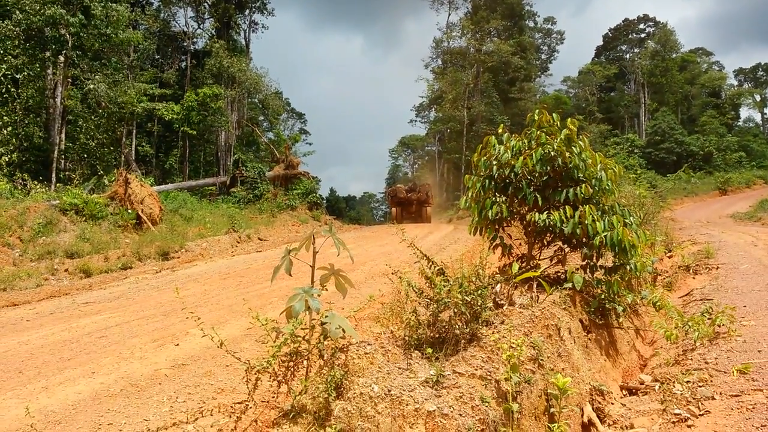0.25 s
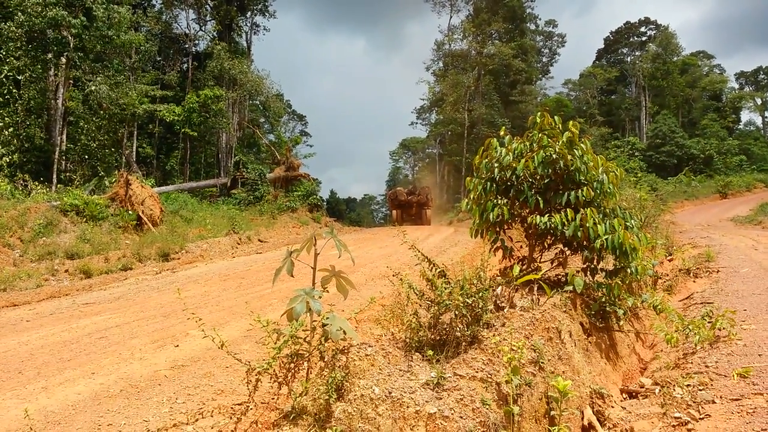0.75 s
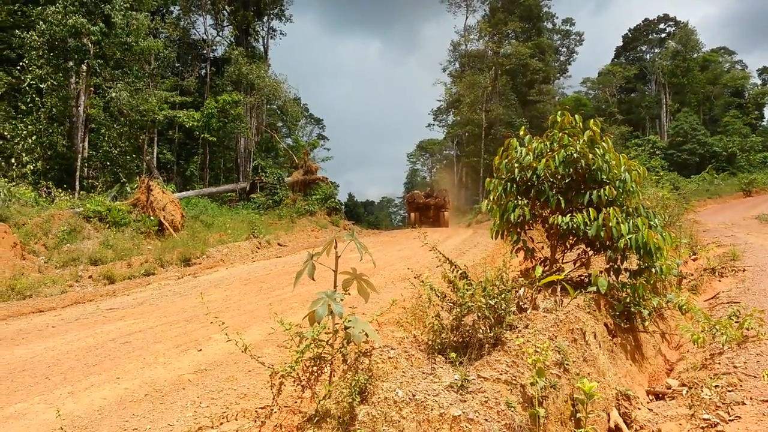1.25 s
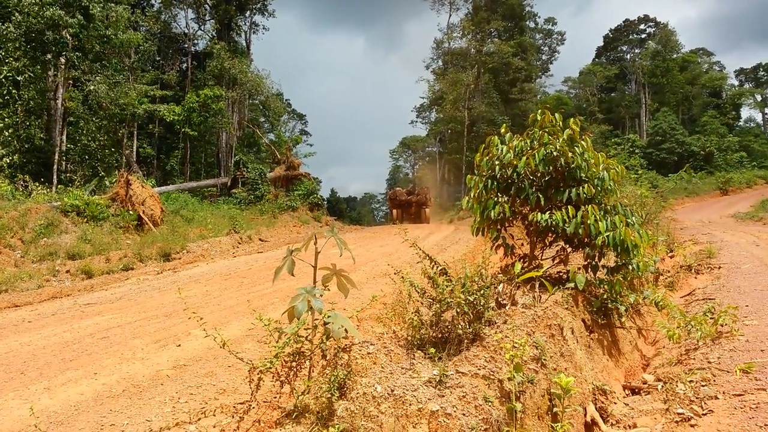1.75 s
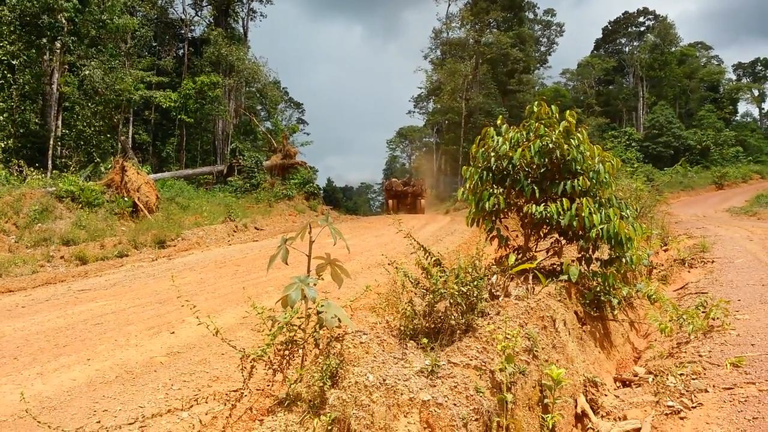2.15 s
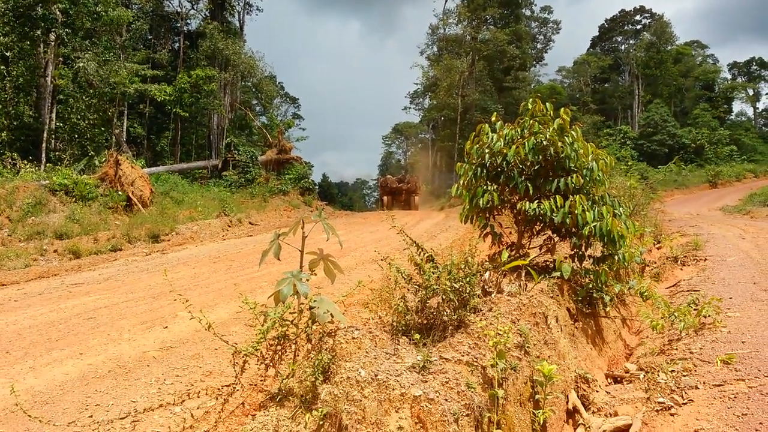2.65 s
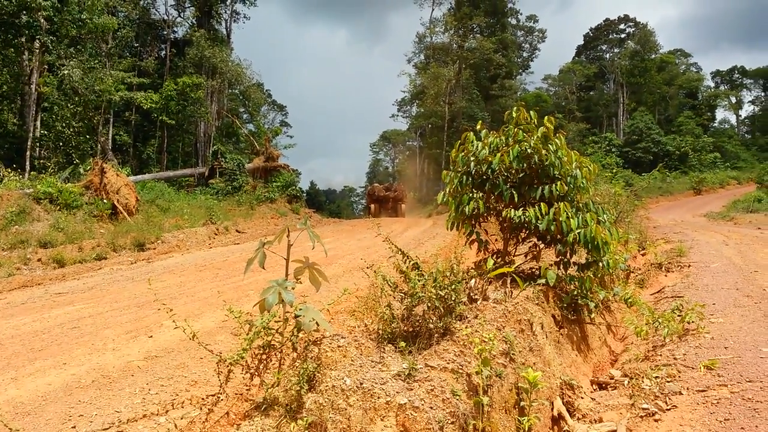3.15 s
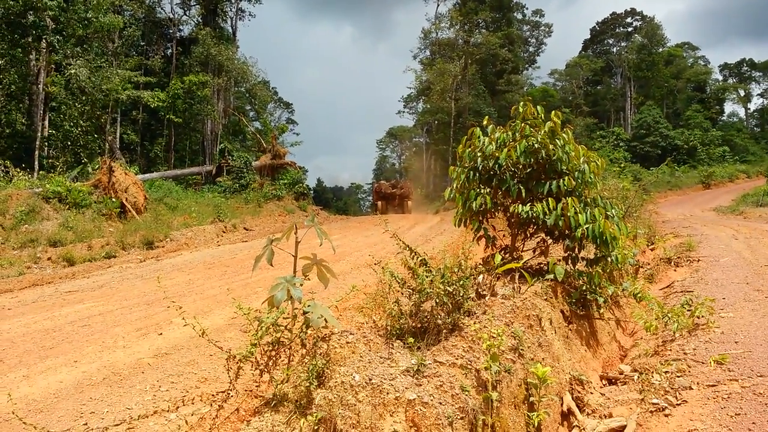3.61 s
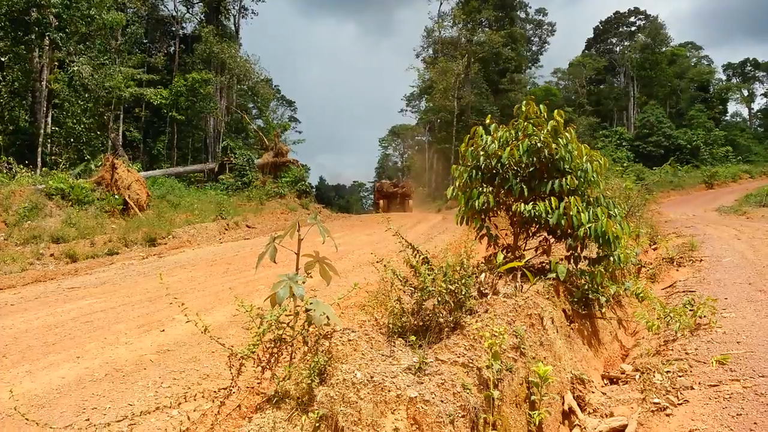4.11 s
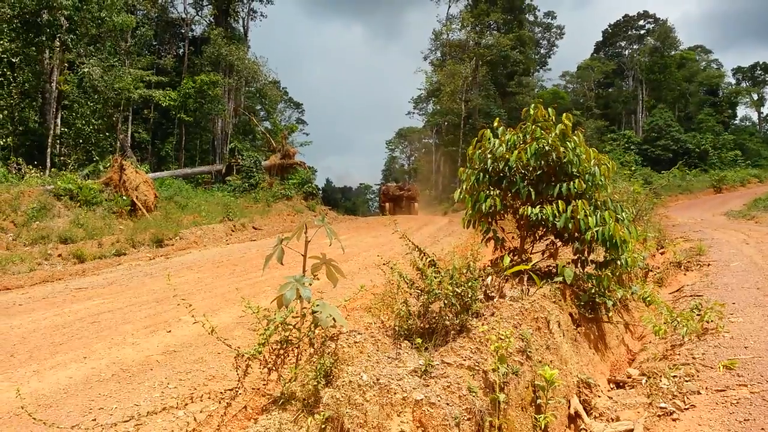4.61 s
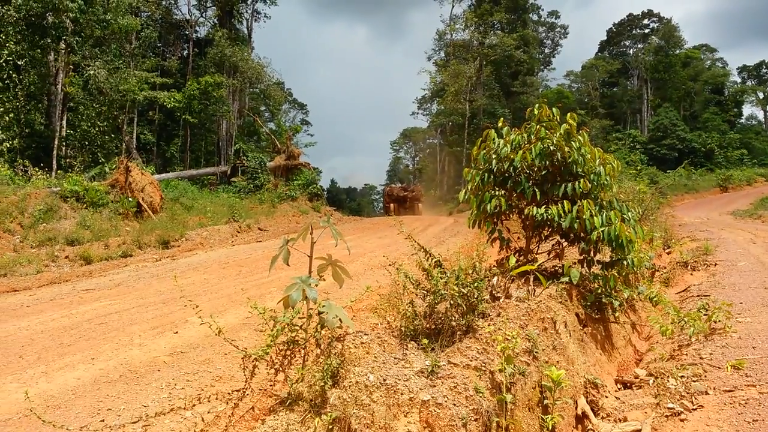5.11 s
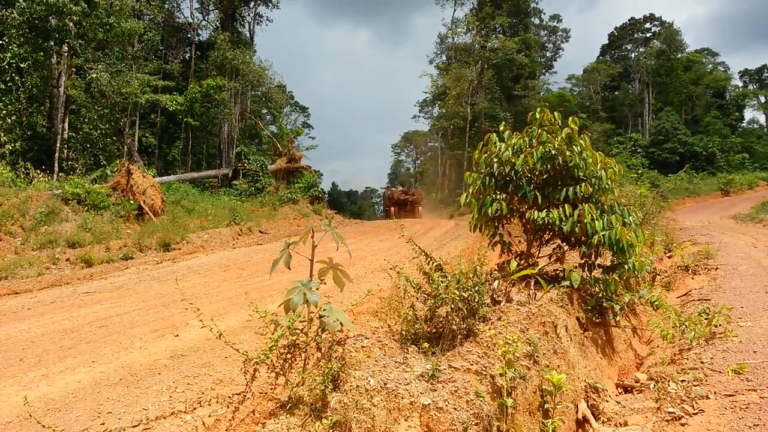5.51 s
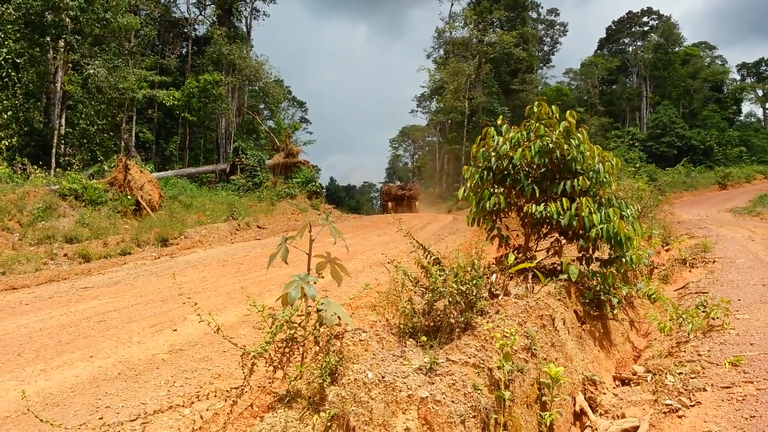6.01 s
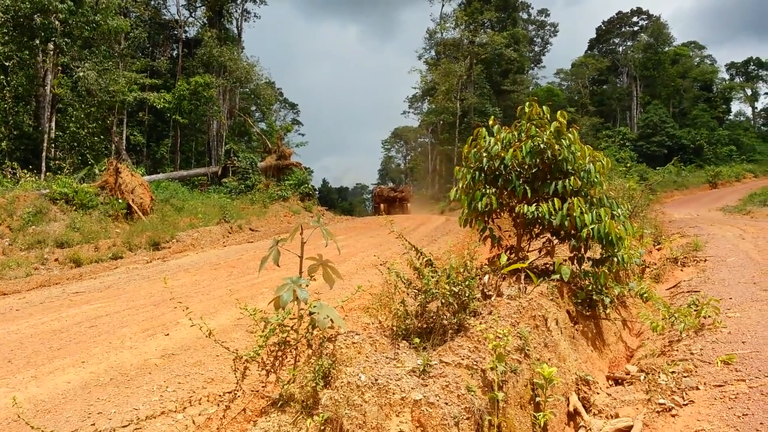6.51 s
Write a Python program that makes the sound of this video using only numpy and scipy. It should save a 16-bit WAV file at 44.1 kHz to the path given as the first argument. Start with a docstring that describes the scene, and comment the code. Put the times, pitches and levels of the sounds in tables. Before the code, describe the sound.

A heavy truck's diesel pulls away up a dirt road, climbing, dropping revs for a hissing gear shift, then pulling hard again.

```python
"""A loaded log truck on a dirt road between forest edges, heard from behind as it draws away.
A puff of compressed air dies off as the load comes on; the diesel climbs through one gear and eases at the top.
It drops its revs for a shift with more puffs of air, then pulls again.
Uneven firings drive drone tones, thumps and gas roar; filtered noise and wavering tones make the stack's howl,
whine and whistles, higher when hot. Jet hiss follows the heat; a forest wash lies under it all."""
import sys
import numpy as np
from scipy import signal
from scipy.fft import rfft, irfft, next_fast_len
from scipy.io import wavfile
from scipy.ndimage import map_coordinates

SR = 44100
rng = np.random.default_rng(int(sys.argv[2]) if len(sys.argv) > 2 else 0)


def unload_audio(sound):
    """Save the sound as a 16-bit wav file, at the path given as the first command line argument."""
    columns = np.transpose(np.atleast_2d(sound))
    # keep every value between -1 and 1, then stretch to whole-number steps
    steps = np.round(np.clip(columns, -1, 1) * 32767)
    wavfile.write(sys.argv[1], SR, steps.astype(np.int16))


N = 298094
TIME_S = np.arange(N) / SR


def amp(db):
    """Decibels to gain."""
    return 10 ** (np.asarray(db) / 20)


def unit(x):
    """Scale so that the mean of the channels has rms 1."""
    mid = np.atleast_2d(x).mean(0)
    return x / np.sqrt(np.mean(mid ** 2) + 1e-20)


def along(points, hz):
    """(Hz, value) points interpolated on a log frequency axis."""
    f, v = np.transpose(points)
    return np.interp(np.log(hz + 1), np.log(f + 1), v)


def shape(points):
    """A (Hz, dB) table as a gain of frequency."""
    return lambda hz: amp(along(points, hz))


def curve(points):
    """(s, value) points interpolated to one value per sample."""
    s, v = np.transpose(points)
    return np.interp(TIME_S, s, v)


def wobble(knots_per_s):
    """A smooth random curve through normal knots."""
    knots = rng.standard_normal(int(N * knots_per_s / SR) + 4)
    return map_coordinates(knots, [np.arange(N) * knots_per_s / SR])


def lagged(x, lag_s):
    """x through a first-order lag."""
    keep = np.exp(-1 / (SR * lag_s))
    return x[0] + signal.lfilter([1 - keep], [1, -keep], x - x[0])


def filtered(x, response):
    """x times a response of frequency."""
    size = x.shape[-1]
    m = next_fast_len(size + SR // 4)
    return irfft(rfft(x, m) * response(np.fft.rfftfreq(m, 1 / SR)), m)[..., :size]


# left-right correlation of noise: f/Hz, correlation
LEFT_RIGHT_LIKENESS = [(100, .99), (330, .98), (480, .9), (720, .76), (1300, .62), (2000, .25), (3200, .08),
                       (5000, 0)]


def rush(colour, size=N):
    """Stereo noise of a given colour: alike in the bass, unrelated in the treble."""
    def mid_side(hz):
        angle = np.arccos(np.clip(along(LEFT_RIGHT_LIKENESS, hz), -1, 1)) / 2
        return colour(hz) * np.array([np.cos(angle), np.sin(angle)])
    mid, side = filtered(rng.standard_normal((2, size)), mid_side)
    return unit(np.array([mid + side, mid - side]))


# engine speed: t/s, four-stroke cycles per s
CYCLES_PER_S = [(0, 13.83), (.25, 13.38), (.43, 14.12), (.97, 14.69), (1.4, 17.05), (1.75, 17.65),
                (2.24, 19.3), (2.6, 19.59), (3.1, 19.88), (3.7, 19.69), (3.97, 19.68), (4.2, 17.78),
                (4.51, 16.12), (4.7, 14.9), (4.96, 13.58), (5.25, 13.99), (5.65, 13.3), (5.9, 14.51),
                (6.21, 15.73), (6.55, 16.23), (6.76, 16.95)]
# engine load: t/s, load (1 = full)
ENGINE_LOAD = [(0, 0.068), (.17, 0.035), (.32, 0.24), (.46, 0.55), (.68, 0.78), (1.05, 0.88), (2.25, 1),
               (3, 0.72), (3.92, 0.76), (4.15, 0.48), (4.45, 0.24), (4.7, .07), (5.02, 0.015), (5.22, 0.42),
               (5.58, 0.78), (6.3, 0.96), (6.76, 0.94)]
# push of the firings; thumps on as the engine slows, until the clutch opens: t/s, level/dB
FIRING_PUSH = [(0, -11), (.18, -19.5), (.32, -7.5), (.6, -1.5), (1.05, 0), (1.4, -2), (2.45, 1.5),
               (3, -0.5), (3.85, -0.5), (4.05, -4.5), (4.55, -3.5), (4.67, -10.5), (5.02, -19),
               (5.22, -7.5), (5.65, 1), (6.76, 0)]


def engine():
    """Speed in cycles per s, load and firing push in dB through the pull, the shift and the next pull."""
    load = np.maximum(curve(ENGINE_LOAD), 1e-3)
    return curve(CYCLES_PER_S), load, curve(FIRING_PUSH)


# strength of each firing within one cycle
CYLINDER_STRENGTHS = [.15, .3, 1.15, .35, .3, .2, .15, .4, .95, .25]


def firings(cycle, scatter=.07):
    """One impulse per firing, sized by how far that cylinder departs from the average, plus scatter."""
    strengths = np.array(CYLINDER_STRENGTHS)
    uneven = strengths - np.mean(strengths)
    number = np.floor(cycle * len(strengths)).astype(int)
    at = np.flatnonzero(np.diff(number)) + 1
    train = np.zeros(N)
    train[at] = uneven[number[at] % len(strengths)] + scatter * rng.standard_normal(len(at))
    return train


def surges(train, life_s=0.00079):
    """Each firing pushes a short surge of gas through the pipe."""
    u = np.arange(SR // 20) / SR / life_s
    return unit(signal.fftconvolve(train, u * np.exp(-u))[:N])


# strong engine orders, multiples of the cycle rate
STRONG_ORDERS = (5, 10, 16)
# pipe resonance crossed by each order: f/Hz, half width/Hz, skirt steepness, peak level/dB at 0 dB push
DRONE_RESONANCES = [(94.9, 4.2, 1.37, -24.5), (128.7, 9.2, 0.79, -26), (323, 41.6, 1.9, -31)]


def drone(cycle, cycles_per_s, push_db):
    """Strong orders are tones in step with the firings, swelling near their pipe resonances."""
    tones = 0
    for order, (hz, half_width_hz, steep, peak_db) in zip(STRONG_ORDERS, DRONE_RESONANCES):
        resonance = np.hypot(1, (order * cycles_per_s - hz) / half_width_hz) ** -steep
        phase = 2 * np.pi * order * cycle + 0.06 * wobble(14)
        level_db = peak_db + push_db + 0.45 * wobble(6)
        tones = tones + np.sqrt(2) * resonance * amp(level_db) * np.cos(phase)
    return tones


# colour of one thump out of the pipe: f/Hz, relative level/dB
THUMP_COLOUR = [(25, -38), (45, -16), (58, -5), (80, 10.5), (97, 0.5), (110, 15.5), (124, -9), (142, 3.5),
                (160, -18), (177, 1), (205, -10), (250, -8), (340, -6), (410, -12), (560, -10), (750, -19),
                (1100, -27), (2500, -80)]
RING_HZ, RING_WIDTH_HZ = 255, 90
CHUG_DB, CHUG_DB_PER_SPEED_DOUBLING = -34.5, -3


def chug(train, push_db, revs):
    """Firings thump out of the pipe, the upper part ringing on; two hard strokes a cycle make it limp."""
    pole = lambda hz: RING_HZ ** 2 - hz ** 2 + 1j * hz * RING_WIDTH_HZ
    pipe = lambda hz: shape(THUMP_COLOUR)(hz) * np.conj(pole(hz)) / pole(hz)  # all-pass ring
    level_db = CHUG_DB + push_db + CHUG_DB_PER_SPEED_DOUBLING * revs
    return unit(filtered(train, pipe)) * amp(level_db)


# colour of the exhaust pipe: f/Hz, relative level/dB
PIPE_COLOUR = [(20, -36), (40, -25), (58, -42), (80, -2), (108, 3), (150, 2.5), (185, 0.5), (230, -3),
               (300, 0.5), (360, -4.5), (420, -8), (570, -3), (750, -10), (1100, -10.5), (2000, -13),
               (6000, -108)]
ROAR_DB, ROAR_DB_PER_LOAD_DOUBLING, ROAR_DB_PER_SPEED_DOUBLING = -31.5, 1.5, 6.5


def exhaust_roar(surge, effort, revs):
    """Turbulent gas roars out of the pipe, gusting with the firings."""
    level_db = ROAR_DB + ROAR_DB_PER_LOAD_DOUBLING * effort + ROAR_DB_PER_SPEED_DOUBLING * revs
    return rush(shape(PIPE_COLOUR)) * amp(level_db + 1.2 * surge)


def heat_travel(heat, cold_drop):
    """Running sample count that slows when cold: cooler gas has a lower sound speed, so lower resonances."""
    return np.cumsum(1 - cold_drop * (1 - heat))


def stack_noise(modes, cold_drop, surge, level_db, heat):
    """Flow noise rings in stack resonances that glide with gas heat and rasp with the firings."""
    def ring(hz):
        return np.sqrt(sum(amp(db) ** 2 / (1 + ((hz - c) / w) ** 2) ** 3 for c, w, db in modes))
    travel = heat_travel(heat, cold_drop)
    gliding = np.array([map_coordinates(side, [travel]) for side in rush(ring, size=N + SR // 4)])
    return gliding * amp(level_db + 1.4 * surge + 0.44 * wobble(22.15))


# howling stack resonances: f/Hz when hot, width/Hz, relative level/dB
HOWL_MODES = [(1333, 51, 3.5), (1450, 83, -2)]
HOWL_COLD_DROP = .2  # share by which f lies lower when cold
HOWL_DB, HOWL_DB_PER_LOAD_DOUBLING, HOWL_DB_PER_SPEED_DOUBLING = -36.5, 5, 1


def howl(surge, effort, revs, heat):
    """The stack's lower resonances, driven by the gas flow."""
    level_db = HOWL_DB + HOWL_DB_PER_LOAD_DOUBLING * effort + HOWL_DB_PER_SPEED_DOUBLING * revs
    return stack_noise(HOWL_MODES, HOWL_COLD_DROP, surge, level_db, heat)


# thinner resonances above the howl: f/Hz when hot, width/Hz, relative level/dB
WHINE_MODES = [(1692, 158, -1.5), (2400, 123, -16), (3036, 176, -13), (3700, 340, -18.5), (4040, 96, -14),
               (4900, 150, -11.5)]
WHINE_COLD_DROP = .26  # share by which f lies lower when cold
WHINE_DB, WHINE_DB_PER_LOAD_DOUBLING = -38.5, 4.5


def whine(surge, effort, heat):
    """The stack's higher resonances, driven by the gas flow."""
    level_db = WHINE_DB + WHINE_DB_PER_LOAD_DOUBLING * effort
    return stack_noise(WHINE_MODES, WHINE_COLD_DROP, surge, level_db, heat)


# resonances singing out: middle t/s, length/s, f/Hz when hot, level/dB
STACK_WHISTLES = [(0.66, .25, 4830, -50), (1.6, 0.92, 3850, -47.5), (2.44, 1.1, 2910, -49.5),
                  (2.45, 0.22, 1800, -50), (4, 0.43, 1620, -44.5), (1.5, 1.9, 1350, -46),
                  (6.51, 0.86, 1355, -44), (6.03, 0.85, 1660, -50), (6.25, 0.93, 5300, -60),
                  (6.501, .6, 4300, -55)]
WHISTLE_WIDTH_HZ = 55


def whistles(heat):
    """The flow locks onto one stack resonance at a time or several, each a wavering whistle."""
    travel_s = heat_travel(heat, WHINE_COLD_DROP) / SR
    step_rad = np.sqrt(2 * np.pi * WHISTLE_WIDTH_HZ / SR)
    out = np.zeros((2, N))
    for middle_s, length_s, hz, db in STACK_WHISTLES:
        waver = np.cumsum(rng.standard_normal((2, N)), axis=1) * step_rad
        swell = np.exp(-2 * ((TIME_S - middle_s) / length_s) ** 2)
        out += 2 * amp(db) * swell * np.cos(2 * np.pi * hz * travel_s + waver)
    return out


# colour of the gas jet: f/Hz, relative level/dB
JET_COLOUR = [(900, -5.5), (1900, -9), (2600, -8.5), (3400, -7), (4400, -6), (5400, -4.5), (6500, -3.5),
              (8100, 3), (9100, -6), (10500, -17), (11300, -20), (12500, -65)]
HISS_HOT_DB, HISS_COLD_CHANGE_DB, HISS_FADE_DB_PER_S = -31, -13.5, -0.5051


def hiss(surge, heat):
    """The fast gas jet hisses, louder when hot, fading as the truck draws away."""
    level_db = HISS_HOT_DB + HISS_COLD_CHANGE_DB * (1 - heat) + HISS_FADE_DB_PER_S * TIME_S
    return rush(shape(JET_COLOUR)) * amp(level_db + .5 * surge + 0.43 * wobble(14))


# compressed air let out by the shifts: t/s, level/dB, rise/s, decay t60/s
AIR_PUFFS = [(-.03, -36, 0.039, 1.65), (4.45, -44.5, 0.12, 1.3), (4.745, -41, 0.066, 0.55),
             (4.82, -36.5, 0.045, 1.1), (4.97, -42.5, 0.13, 0.28)]
# colour of the air valve: f/Hz, relative level/dB
AIR_COLOUR = [(2500, -32), (4500, -9), (6500, -7), (8000, 4.5), (9300, -4.5), (11000, -13), (14000, -23)]


def shift_air():
    """Each puff of the air valve opens quickly and dies as the pressure falls."""
    flow = np.zeros(N)
    for start_s, db, rise_s, t60_s in AIR_PUFFS:
        age_s = TIME_S - start_s
        opening = np.clip(age_s / rise_s, 0, 1)
        decay = np.exp(-np.log(1000) * np.maximum(age_s - rise_s, 0) / t60_s)
        flow += amp(db) * opening * decay
    return flow * rush(shape(AIR_COLOUR))


# colour of the surroundings: f/Hz, relative level/dB
FOREST_COLOUR = [(20, -45), (35, -20), (65, 1), (130, -2.5), (240, -5), (400, -17), (540, -13.5),
                 (930, -23.5), (1080, -14.5), (1360, -8), (1550, -18.5), (2300, -19), (3200, -26),
                 (6500, -21.5), (8200, -19.5), (10500, -27.5), (13000, -63)]
FOREST_DB = -37


def surroundings():
    """Distant rumble and forest hiss: a wash of noise swaying slightly in level."""
    return rush(shape(FOREST_COLOUR)) * amp(FOREST_DB + 1.1 * wobble(3))


REFERENCE_CYCLES_PER_S = 20
HEAT_LAG_S = .045
PIPE_FADE_DB_PER_S = -0.2773  # truck draws away


def scene():
    """Engine speed, load and push drive the truck's layers; air and forest are added."""
    cycles_per_s, load, push_db = engine()
    cycle = np.cumsum(cycles_per_s) / SR
    # in doublings
    effort, revs = np.log2(load), np.log2(cycles_per_s / REFERENCE_CYCLES_PER_S)
    heat = lagged(load, HEAT_LAG_S)
    train = firings(cycle)
    surge = surges(train)
    pipe = drone(cycle, cycles_per_s, push_db) + chug(train, push_db, revs)
    pipe = pipe + exhaust_roar(surge, effort, revs)
    pipe = pipe * amp(PIPE_FADE_DB_PER_S * TIME_S)
    stack = howl(surge, effort, revs, heat) + whine(surge, effort, heat) + whistles(heat)
    return pipe + stack + hiss(surge, heat) + shift_air() + surroundings()


# balance of the two microphone ports: f/Hz, left minus right level/dB
PORT_BALANCE = [(200, -3), (700, -3.5), (1050, -6.5), (1400, -9), (1800, -9.5), (2400, -4.5), (2950, 2.5),
                (4000, -0.5), (4700, -5), (6000, -4.5), (7100, 3), (8300, -14.5), (10000, -9)]
TOP_HZ = 14200


def record(dry, lead_s=4.5e-5):
    """Each microphone port has its own colour; left hears lead_s earlier; cut at TOP_HZ."""
    def ports(hz):
        ratio = amp(along(PORT_BALANCE, hz))
        left = ratio * np.exp(2j * np.pi * hz * lead_s)
        return np.array([left, np.ones_like(left)]) * np.sqrt(2 / (1 + ratio ** 2))
    return filtered(filtered(dry, ports), lambda hz: hz < TOP_HZ)


dry = scene()
out = record(dry)
unload_audio(out)
```